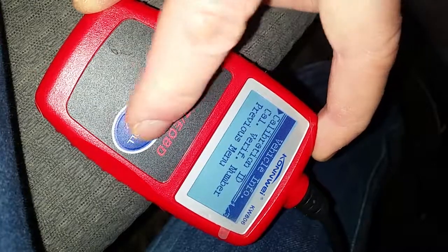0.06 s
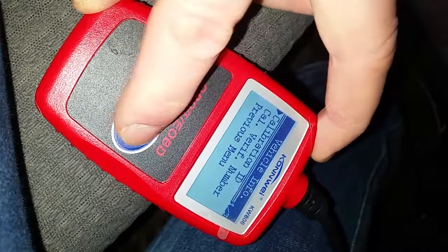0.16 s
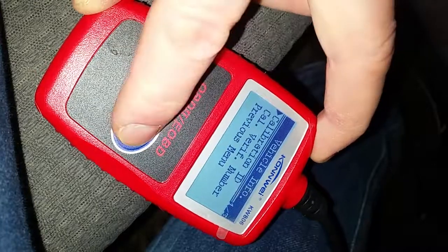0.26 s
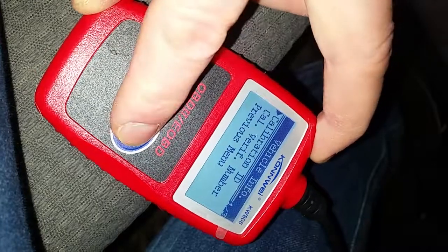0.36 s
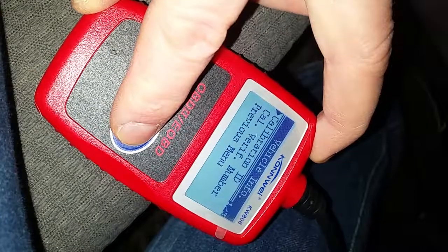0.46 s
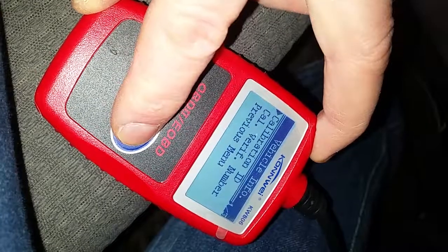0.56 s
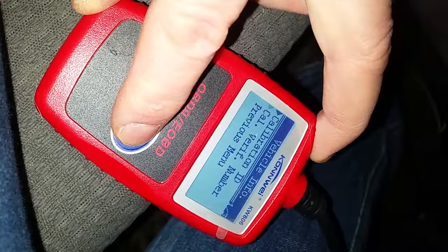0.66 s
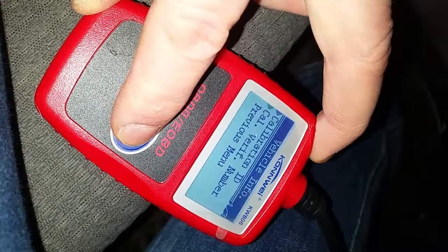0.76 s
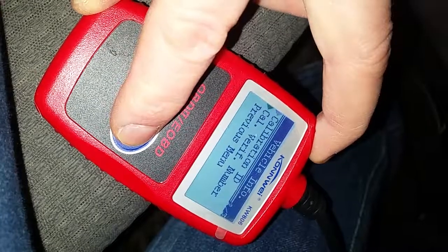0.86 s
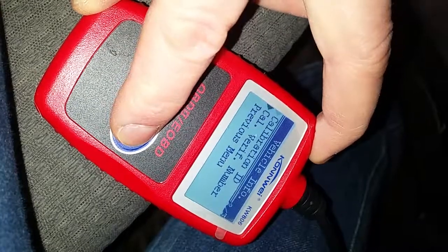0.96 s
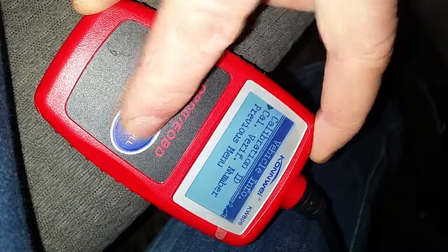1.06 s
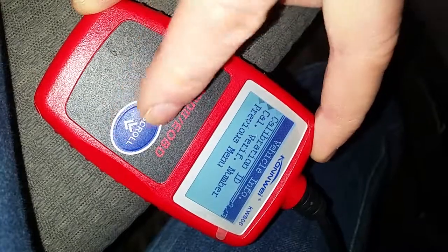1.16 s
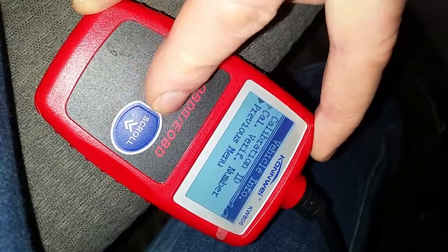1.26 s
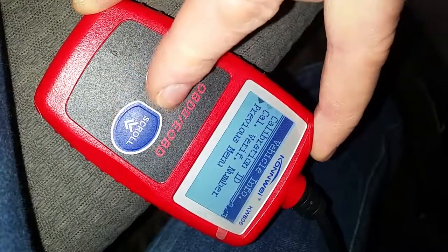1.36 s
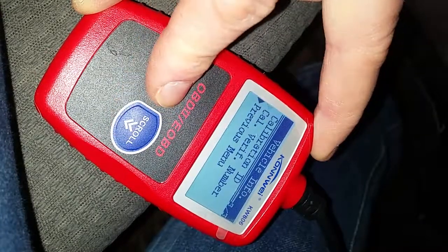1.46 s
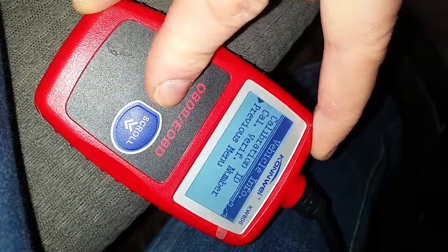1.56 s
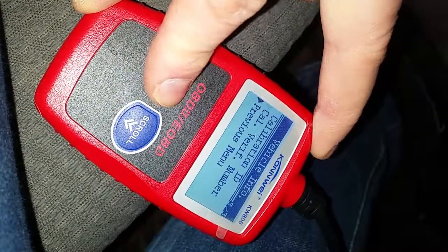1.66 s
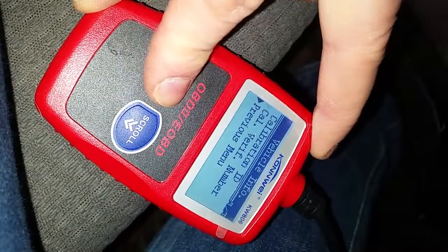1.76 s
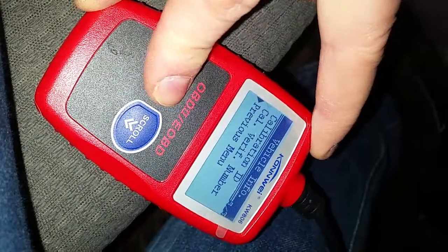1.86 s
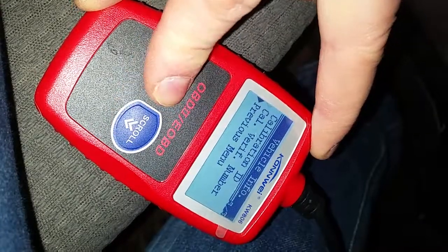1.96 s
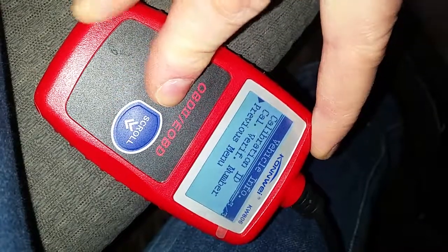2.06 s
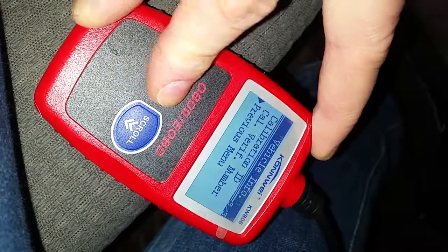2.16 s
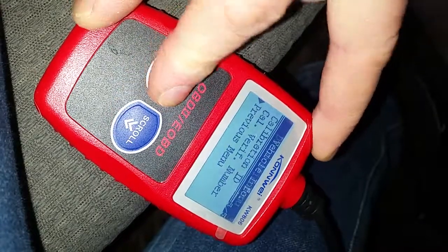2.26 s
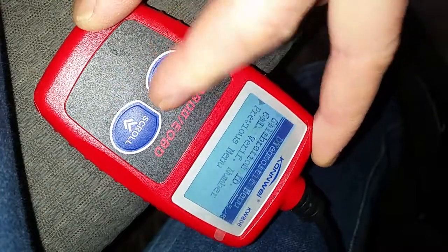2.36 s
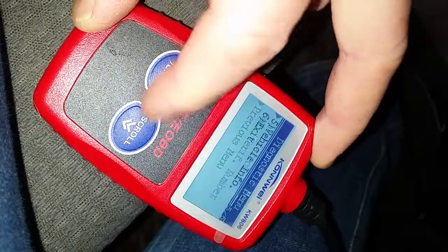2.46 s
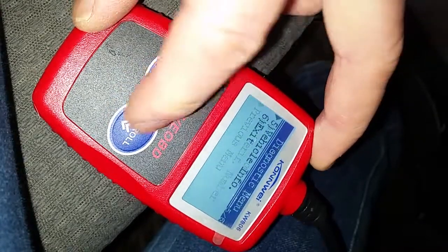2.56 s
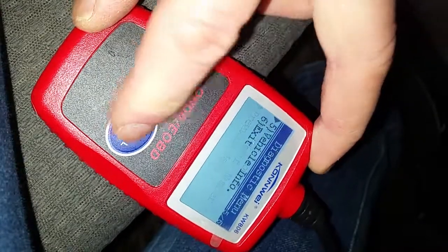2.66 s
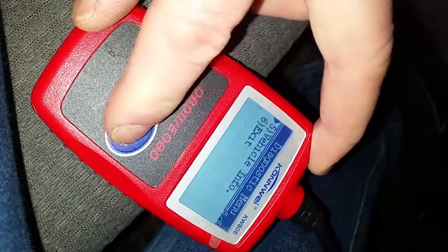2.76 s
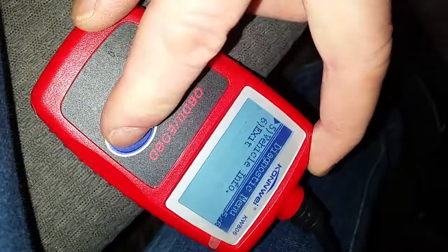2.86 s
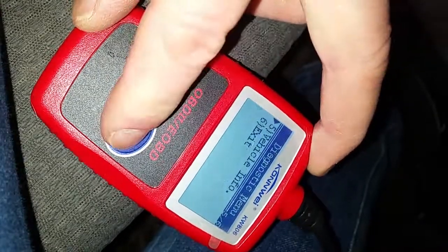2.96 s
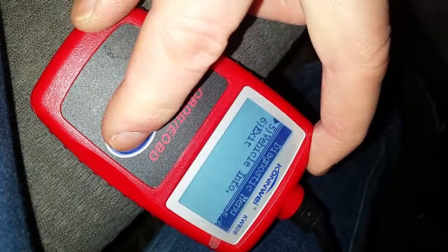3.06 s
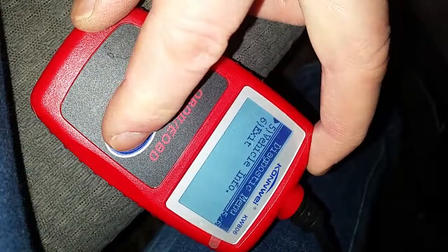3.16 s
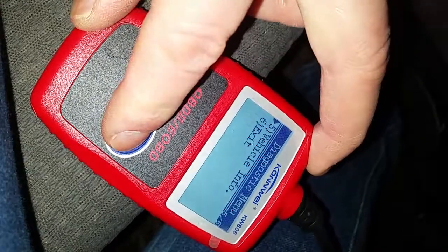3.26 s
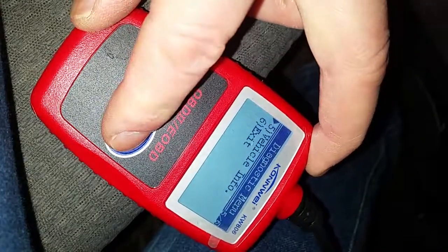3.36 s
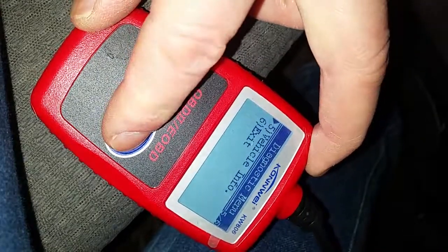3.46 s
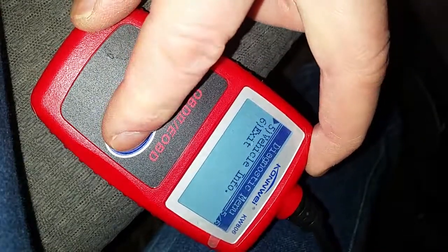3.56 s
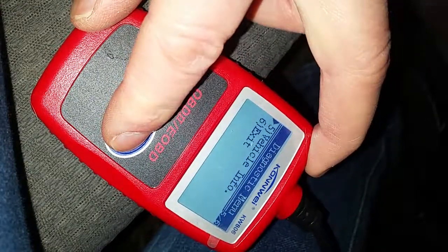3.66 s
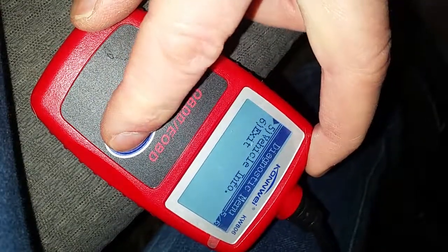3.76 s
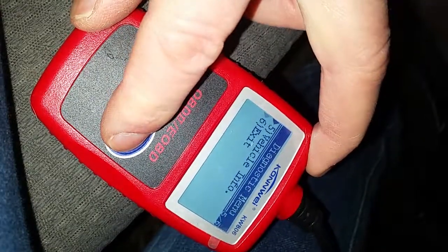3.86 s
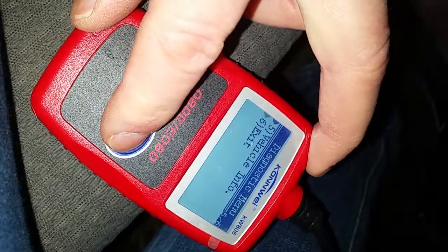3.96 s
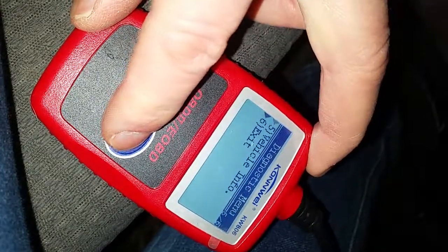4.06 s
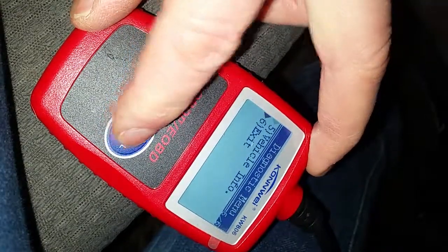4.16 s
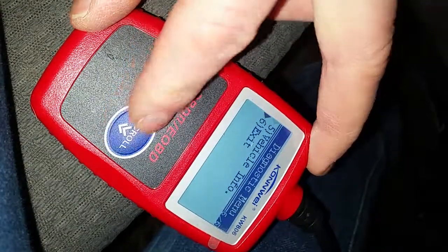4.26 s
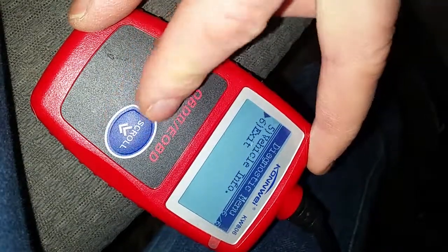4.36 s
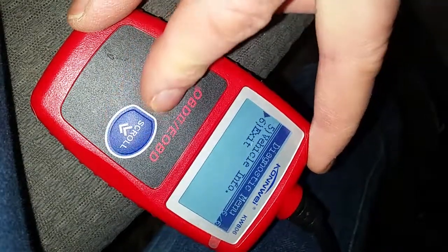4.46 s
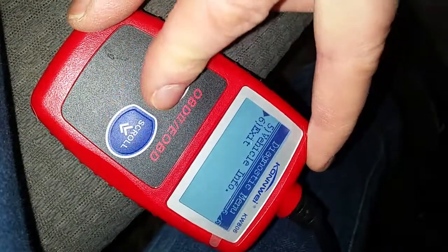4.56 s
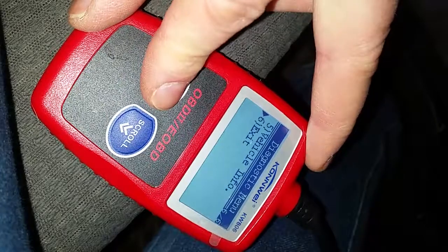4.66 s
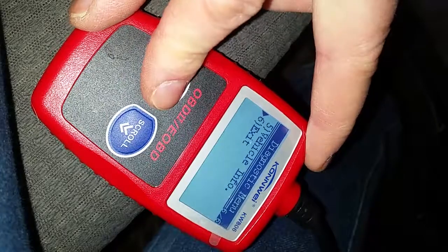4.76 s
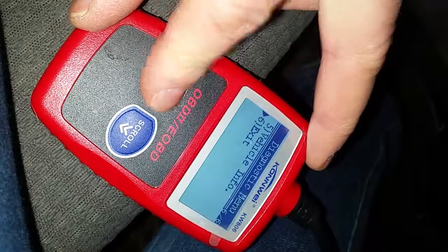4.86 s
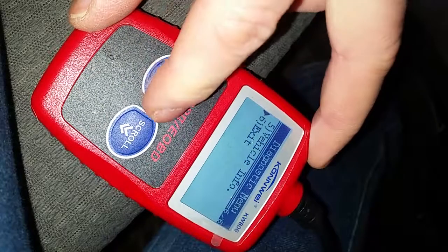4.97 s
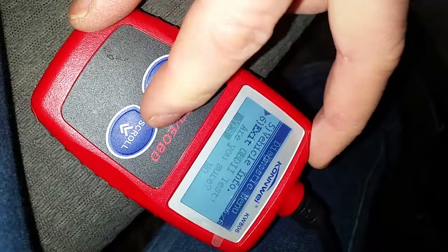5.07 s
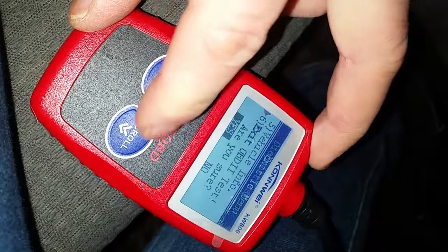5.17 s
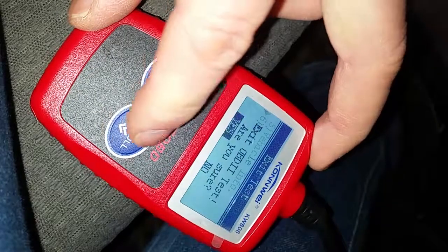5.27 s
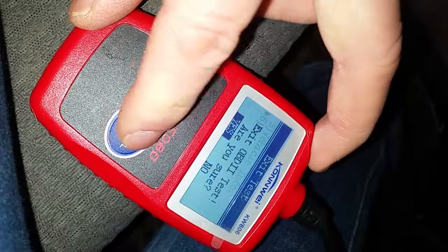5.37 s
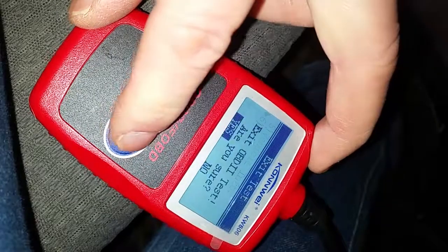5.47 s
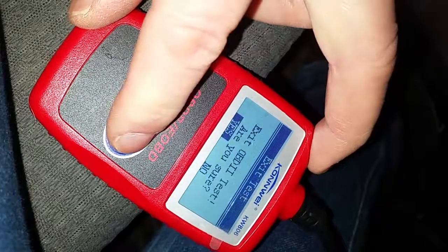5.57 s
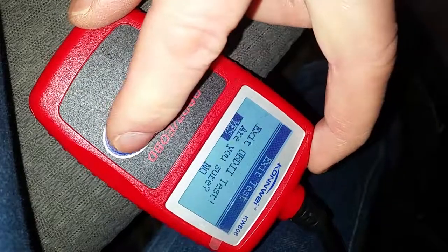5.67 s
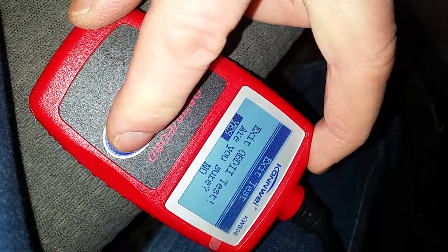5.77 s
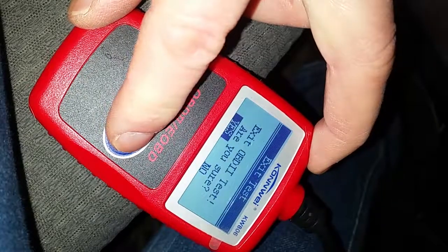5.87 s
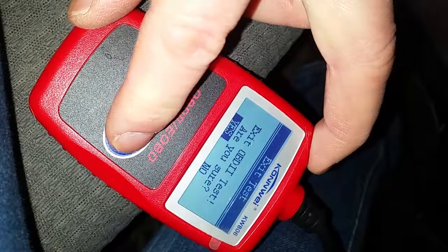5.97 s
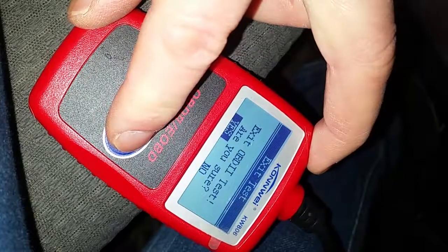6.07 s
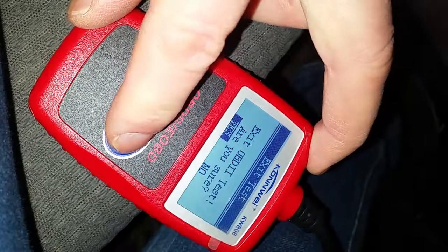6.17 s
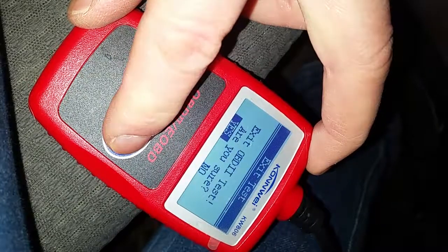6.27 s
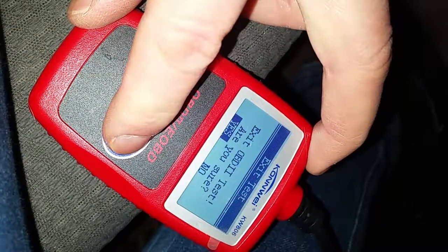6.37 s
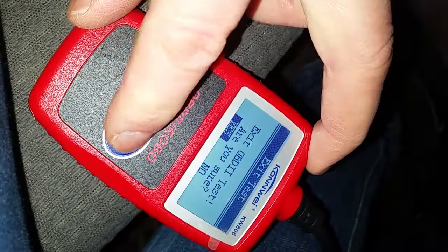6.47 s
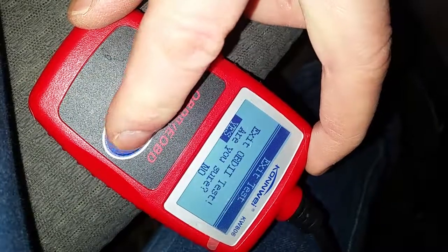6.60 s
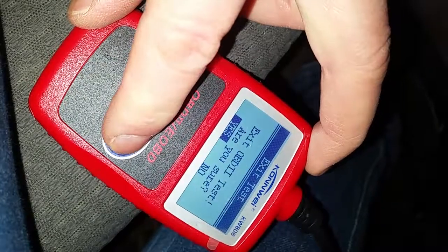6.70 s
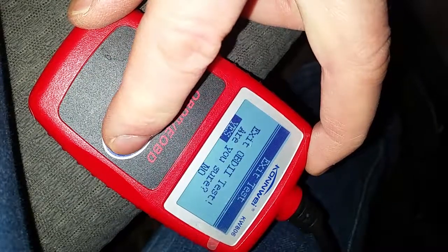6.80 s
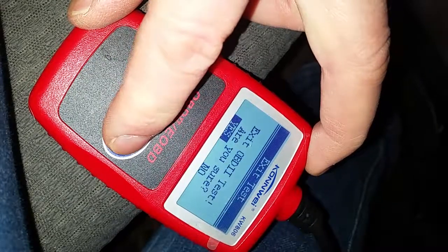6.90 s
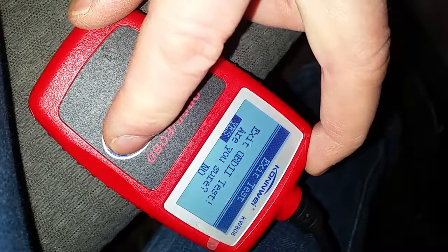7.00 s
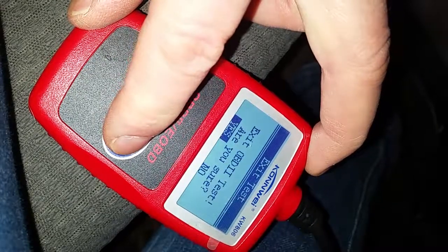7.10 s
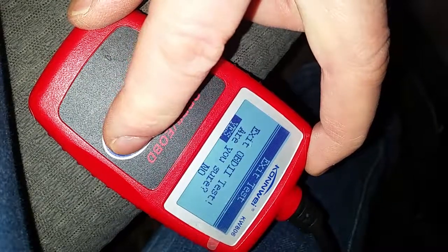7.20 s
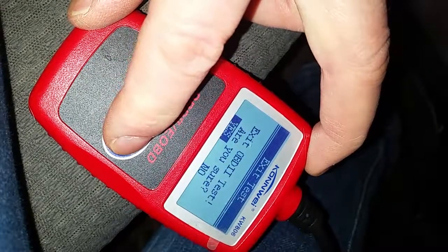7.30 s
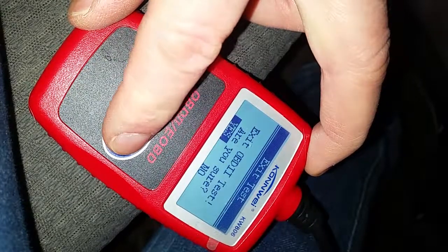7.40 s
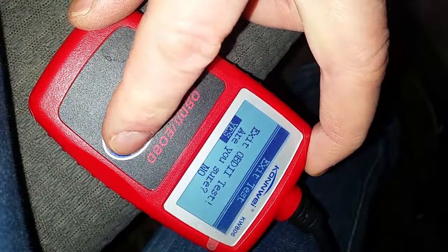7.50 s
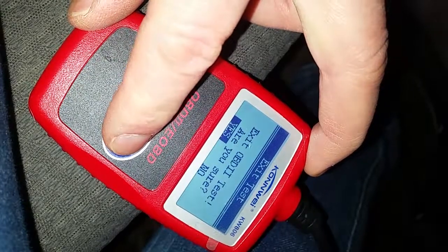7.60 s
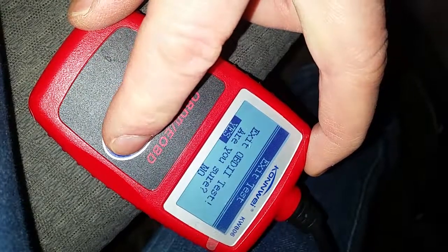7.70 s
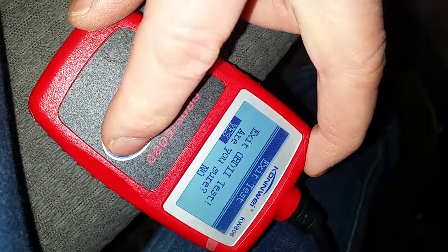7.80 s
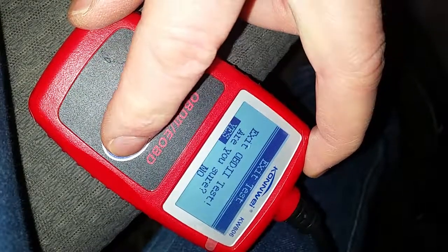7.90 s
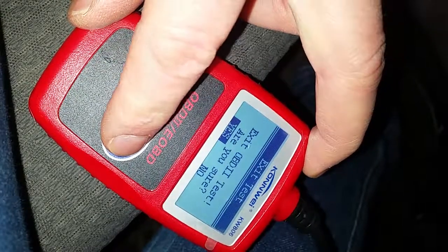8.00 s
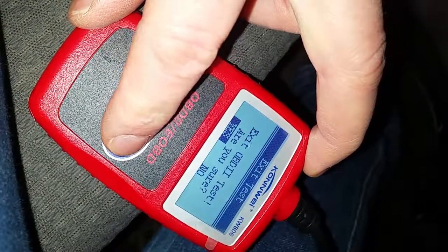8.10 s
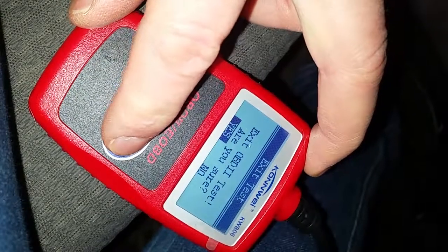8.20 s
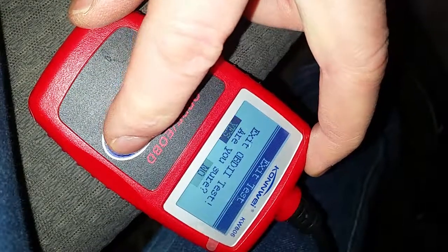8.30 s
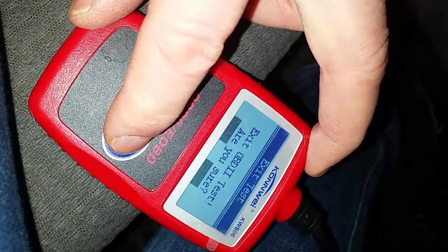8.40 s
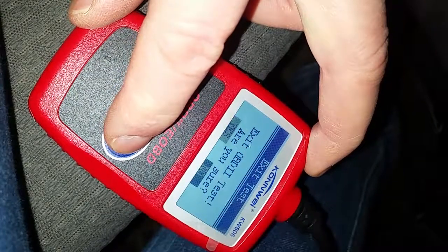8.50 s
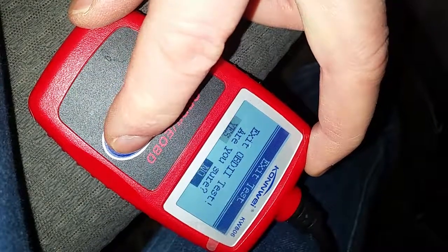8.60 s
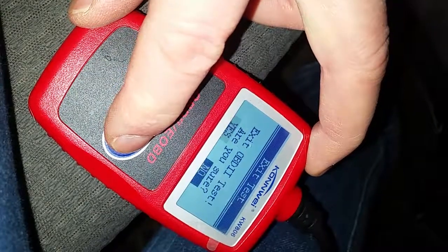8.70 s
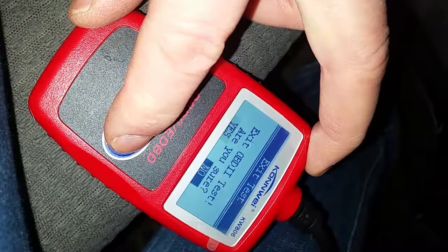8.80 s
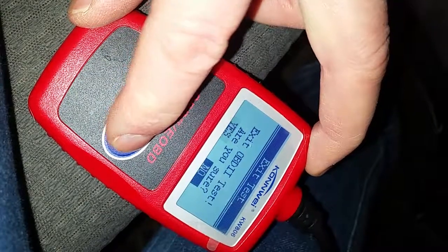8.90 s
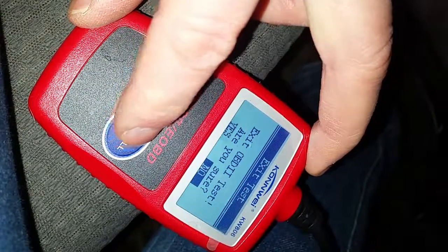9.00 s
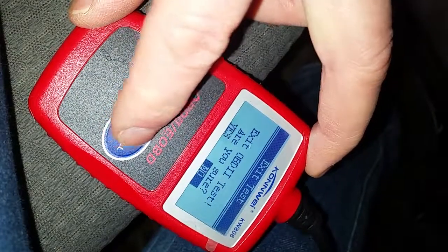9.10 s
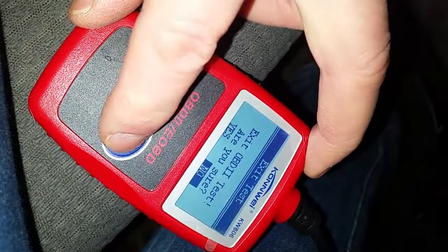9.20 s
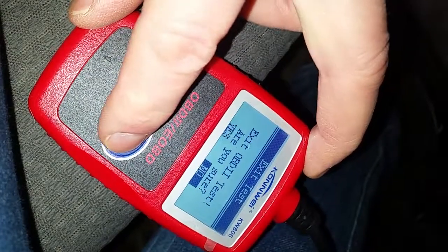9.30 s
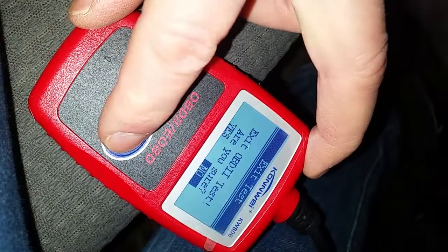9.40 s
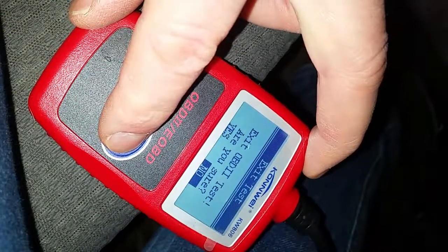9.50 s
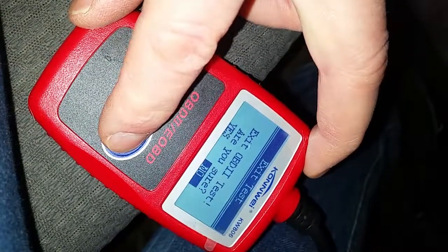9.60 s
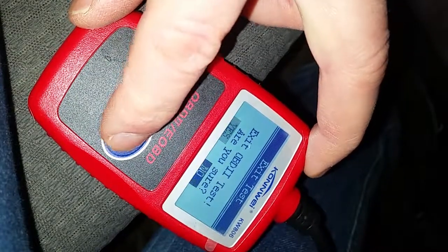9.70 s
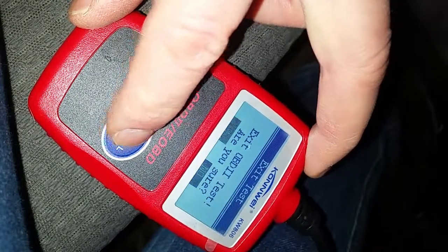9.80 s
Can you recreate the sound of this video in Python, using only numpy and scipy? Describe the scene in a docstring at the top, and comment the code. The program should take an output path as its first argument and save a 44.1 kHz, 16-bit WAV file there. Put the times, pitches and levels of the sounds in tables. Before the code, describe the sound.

Inside a quiet, padded car cabin, a thumb works stiff plastic buttons right beside the microphone. Each stroke is a bright snap with a small boxy knock, answered by a slightly harder release click. Early presses are mixed with dull touches and faint sliding skin; after five seconds only the background remains for about three seconds, then two more separate presses. Low hum, rumble and faint hiss continue throughout.

```python
"""Buttons of a small plastic handheld device, worked by a thumb close to a stereo microphone, inside a car.
Each stroke clicks twice, down and back up: filtered noise bursts tick and a bank of case modes knocks.
Between strokes, touches ring the same modes and a sliding hand makes faint swells of rough noise.
The padded cabin adds a short echo and a bright hush trails each click.
Behind lie a low hum of wavering tones over rumble, and a thin steady hiss of shaped noise."""
import sys
import numpy as np
from scipy import signal
from scipy.fft import rfft, irfft
from scipy.io import wavfile
from scipy.ndimage import uniform_filter1d

SR = 44100
rng = np.random.default_rng(int(sys.argv[2]) if len(sys.argv) > 2 else 0)


def output_pcm(signal):
    """Save a mono or channel-first signal as 16-bit PCM at the path in sys.argv[1].

    Samples are clipped to [-1, 1] before scaling.
    """
    pcm = np.clip(np.atleast_2d(signal).T, -1, 1) * 32767
    wavfile.write(sys.argv[1], SR, np.round(pcm).astype(np.int16))


N = 434385  # length of the scene [samples]

# Button strokes, levels relative: (down time [s], back up time [s], knock level [dB],
# upper case mode level [dB], upward tick level [dB], upward tick tilt [dB per octave])
BUTTON_STROKES = [(.403, 0.6539, -4, 1.5, -1, -4), (0.949, 1.1153, -5.5, 4.5, 2.5, -2),
                  (1.8682, 2.142, -7.5, 7.5, 1, -2.5), (3.6545, 3.8817, -2, -0.5, -1, -2),
                  (4.761, 4.9454, -5.5, 7, 4.5, -1), (7.9904, 8.2435, -4, -0.5, 2.5, 0),
                  (9.4876, 9.681, -1.5, -1.5, 2, -1)]
# Tick colour as the dome gives way: (frequency [Hz], left level [dB], right level [dB])
PRESS_TICK_COLOUR = [(1800, -32, -44), (2520, -41, -19), (3480, -14, -13), (5000, -4.5, -18),
                     (6070, -24, -16), (6220, -4, -11), (7000, -23, -18.5), (8570, -10.5, -9.5),
                     (10000, -33, -8), (11650, -3, -2.5), (13200, -27, -8), (13900, -14, 3.5),
                     (15300, 1, 2), (16500, -20, 19)]
# Tick colour as the dome springs back: (frequency [Hz], left level [dB], right level [dB])
RELEASE_TICK_COLOUR = [(1850, -20, -33), (2710, -45, -13.5), (3330, -10.5, -18.5), (4400, -13, -11.5),
                       (5160, -4.5, -14), (5470, -27.5, -15), (6200, -7.5, -23), (6920, -26, -22),
                       (10850, -38, -25.5), (12700, -21, -11.5), (13400, -28, -17), (15700, -21, -13),
                       (16500, -23, -14)]
# Modes of the hand-held case, relative:
# (frequency [Hz], decay by 60 dB [s], left level [dB], right level [dB])
CASE_MODES = [(117, 0.12, -48, -46), (213, 0.029, -24.5, -23), (353.5, 0.02, -28, -29.5),
              (428, 0.023, -29, -27.5), (573, 0.022, -33, -32), (827, 0.021, -27.5, -28),
              (915, 0.018, -44, -24), (1037, 0.016, -25.5, -37.5), (1333, 0.037, -38, -50.5),
              (1465, 0.021, -28, -34.5), (1710, 0.025, -30.5, -42), (2020, 0.036, -66, -41)]
# Thumb and fingers touching the case, levels relative:
# (time [s], knock level [dB], contact time [s], lowest case mode level [dB], tick level [dB])
CASE_TOUCHES = [(.325, -21, 0.00095, 6, -34), (1.641, -12, 0.0014, 5, -22), (1.656, -2, 0.0068, 0, -45),
                (1.669, -14, 0.00193, 0.5, -37), (1.686, -9.5, 0.0029, 5, -39),
                (2.444, -32, 0.00055, 5, -29), (3.361, -25.5, 0.0012, 3, -44),
                (4.924, -20, 0.0014, -2, -19), (9.337, -20.5, 0.00095, 6.5, -36),
                (9.369, -37, 0.00076, 0, -24), (9.407, -6.5, 0.0021, -20, -46)]
# The hand sliding over the case:
# (centre time [s], half length to 1/e [s], dull rub level [dB], fine skin hiss level [dB])
HAND_SLIDES = [(0.058, 0.34, -72.5, -80), (1.2, 0.08, -67, -71), (1.303, 0.17, -63, -79),
               (1.672, 0.049, -61.5, -68), (2.417, 0.25, -69, -71.5), (4.38, 0.11, -61, -73),
               (4.511, 0.042, -63, -81.5), (4.68, 0.14, -68.5, -70.5), (4.975, .05, -61, -72),
               (5.077, 0.25, -70.5, -73.5)]
# Relative colour of the dull rub: (frequency [Hz], level [dB])
RUB_COLOUR = [(250, -10), (480, 6), (630, 2), (800, 3.5), (960, -3), (1150, -18), (1550, -16.5),
              (1850, -11), (2300, -32.5), (5000, -25), (9000, -59.5)]
# Relative colour of the fine skin hiss: (frequency [Hz], level [dB])
SKIN_COLOUR = [(900, -5.5), (1350, 10), (1900, 3), (2300, -5.5), (3000, -0.5), (6500, -16.5), (9500, -9),
               (12500, -1.5), (16000, -5.5)]
# Relative colour of the hush behind each click: (frequency [Hz], level [dB])
HUSH_COLOUR = [(300, -9), (900, 0), (1500, 6.5), (2500, -6), (6000, -9.5), (9500, -16), (12000, -3.5),
               (14500, 1), (16000, 4)]
# Steady tones of the hum, before they throb: (frequency [Hz], level [dB rms])
HUM_TONES = [(97, -62), (212.3, -53.5), (388, -77.5), (425, -77.5), (582, -93), (646, -82), (775, -81.5)]
# Low cabin rumble, the part alike left and right: (frequency [Hz], density [dB per Hz])
CABIN_RUMBLE = [(10, -102), (30, -93), (38, -74), (49, -71.5), (70, -73), (110, -70), (150, -77.5),
                (220, -79), (300, -85.5), (450, -95), (700, -102), (1000, -110), (1500, -118), (3000, -135),
                (6000, -160)]
# Thin steady hiss: (frequency [Hz], left density [dB per Hz], right density [dB per Hz])
THIN_HISS = [(1500, -117, -117), (2420, -119, -120), (2895, -114, -108), (3160, -113, -107),
             (3685, -107, -92), (4185, -109, -95.5), (4704, -114, -104), (5710, -127, -134),
             (6470, -133, -134), (9900, -133, -132.5), (12100, -124, -121), (13560, -121, -116),
             (14140, -112.5, -103), (15300, -113, -104.5)]

# The dome gives way at the same force each time, so its downward tick is nearly alike.
PRESS_TICK_DB, PRESS_TILT_DB = -2.3, -0.5  # level [dB] before the stiffness lift, tilt [dB per octave]
# A stiffer contact, which drives the upper case modes, also lifts the downward tick.
TICK_PER_UPPER = 0.18  # [dB per dB]
# Springing back, the button knocks harder and drives the upper modes more.
RELEASE_KNOCK_DB, RELEASE_UPPER_DB = 4, 3.5  # [dB]
PRESS_RING_DB = -11  # the dome's ring under its first crack, going down [dB]
TOP_HZ = 15900  # upper edge of the recorder's band [Hz]


def strokes():
    """Split each stroke into a click down and a click up, as rows for clicks()."""
    presses, releases = [], []
    for down_s, up_s, knock_db, upper_db, tick_db, tilt_db in BUTTON_STROKES:
        press_tick_db = PRESS_TICK_DB + TICK_PER_UPPER * upper_db
        presses.append((down_s, knock_db, upper_db, press_tick_db, PRESS_TILT_DB))
        release_knock_db = knock_db + RELEASE_KNOCK_DB
        releases.append((up_s, release_knock_db, upper_db + RELEASE_UPPER_DB, tick_db, tilt_db))
    return presses, releases


def clicks(rows, direction, spectrum, crack_t60, ring_t60, ring_db, knock_db, recoil_db):
    """The dome flips with a tick and a small recoil; a moment later the button hits its stop."""
    travel_s = 0.001098
    out = np.zeros((2, N))
    for s, level_db, upper_db, tick_db, tilt_db in rows:
        snap = tick(spectrum, crack_t60, ring_t60, ring_db, tilt_db)
        recoil = knock(0.00065, upper_db)
        stop = knock(0.00067, upper_db)
        add(out, s, undb(tick_db) * snap)
        add(out, s, -direction * undb(level_db + recoil_db) * recoil)
        add(out, s + travel_s, direction * undb(level_db + knock_db) * stop)
    return out


def tick(spectrum, crack_t60, ring_t60, ring_db, tilt_db=0.0):
    """A sharp crack, then the dense high modes of dome and shell, as decaying noise."""
    t = np.arange(SR // 10) / SR
    shape = fade(t, crack_t60) + undb(ring_db) * fade(t, ring_t60)
    burst = rfft(noise_pair(len(t), 0) * shape, 2 * len(t))
    # the snap feeds all bands evenly; only the fine mode pattern is chance
    band_power = uniform_filter1d(np.abs(burst) ** 2, 300)
    burst = burst / np.sqrt(band_power)
    # the tilt turns about 8 kHz and levels off below 2 kHz
    octaves = np.log2(np.linspace(1, SR / 2, burst.shape[1]) / 8000)
    tilted = irfft(burst * undb(tilt_db * np.maximum(octaves, -2)))
    snap = colour(tilted, spectrum)
    # a quarter millisecond later, so that the onset before time zero is kept
    return np.roll(snap, SR // 4000, axis=1)[:, :len(t)]


def knock(contact_s, upper_db=0.0, low_db=0.0):
    """The case rings after a smooth push; grip and point of contact change its modes a little each time."""
    scatter, scatter_db = 0.013, 0.96  # spread of mode frequency [ratio] and level [dB]
    left_lag_s = 0.00015
    t = np.arange(SR // 10) / SR
    hz, t60, *ears_db = np.transpose(CASE_MODES)
    detune, vary = rng.standard_normal((2, len(hz)))
    mode_hz = hz * (1 + scatter * detune)
    modes = np.sin(2 * np.pi * mode_hz[:, None] * t) * fade(t, t60[:, None])
    # the point of contact decides how strongly the lowest and the upper modes are driven
    drive_db = low_db * (hz < 280) + upper_db * np.interp(hz, [500, 1500], [0, 1])
    ring = undb(np.array(ears_db) + drive_db + scatter_db * vary) @ modes
    # the knock reaches the right microphone first
    arrival = t - np.array([[left_lag_s], [0]])
    push = np.sin(np.pi * np.clip(arrival / contact_s, 0, 1)) ** 2
    return signal.fftconvolve(ring, push / push[1].sum(), axes=1)[:, :len(t)]


def touches():
    """Soft skin pushes slowly, so mainly the low modes answer; the nail adds a tiny tick."""
    out = np.zeros((2, N))
    for s, knock_db, contact_s, low_db, tick_db in CASE_TOUCHES:
        skin_knock = knock(contact_s, upper_db=-0.5, low_db=low_db)
        nail = tick(RELEASE_TICK_COLOUR, crack_t60=0.0037, ring_t60=0.025, ring_db=-16, tilt_db=4.0)
        add(out, s, -undb(knock_db) * skin_knock)
        add(out, s, undb(tick_db) * nail)
    return out


def slides(grain_db=1.0, skin_grain_db=2.5):
    """Faint uneven friction that swells and fades with each move of the hand."""
    t = np.arange(N) / SR
    catch = walk(90)  # the same unevenness roughens rub and skin
    rub_grain = undb(grain_db * catch + 2 * walk(900))
    rub = colour(noise_pair(N, 0.56) * rub_grain, RUB_COLOUR)
    skin = colour(noise_pair(N, 0) * undb(skin_grain_db * catch), SKIN_COLOUR)
    rub, skin = rub / rub.std(), skin / skin.std()
    out = np.zeros((2, N))
    for s, half_s, rub_db, skin_db in HAND_SLIDES:
        swell = np.exp(-((t - s) / half_s) ** 2)
        out += swell * (undb(rub_db) * rub + undb(skin_db) * skin)
    return out


def hush(rows, db=-68.0, t60=1.7):
    """A faint bright noise starts at each click and dies away; overlapping tails add in power."""
    t = np.arange(N) / SR
    power = sum((t > s) * fade(np.abs(t - s), t60) ** 2 for s, *_ in rows)
    air = colour(noise_pair(N, 0), HUSH_COLOUR)
    return undb(db) * np.sqrt(power) * air / air.std()


def cabin(x, wall_db=-20.0, wall_t60=0.17):
    """Short diffuse reflections from the padded cabin, as decaying noise that builds up first."""
    t = np.arange(SR // 3) / SR
    walls = noise_pair(len(t), 0.2) * fade(t, wall_t60) * (1 - fade(t, 0.02))
    walls = undb(wall_db) * walls / np.linalg.norm(walls[0])
    echo = signal.fftconvolve(x, walls, axes=1)[:, :N]
    return colour(echo, [(300, 2.5), (1500, -6.5), (7000, 3), (15000, 0.0)])


def hum(waver_hz=1.304, throb_db=1.05):
    """Steady tones that waver slightly, over a rumble that is alike left and right in the bass."""
    tones = 0
    for hz, db in HUM_TONES:
        phase = 2 * np.pi * np.cumsum(hz + waver_hz * walk(7)) / SR
        level = np.sqrt(2) * undb(db + throb_db * walk(9))
        tones = tones + level * np.sin(phase)
    mid, side = rng.standard_normal((2, N)) * np.sqrt(SR / 2)  # unit power per Hz
    side = colour(side, [(50, -20.5), (110, -16.5), (200, -13.5), (400, -3.5), (1000, 1.5)])
    return tones + colour(mid + side * np.array([[1], [-1]]), CABIN_RUMBLE)


def hiss():
    """Smooth noise with one hump in the presence range and one at the very top."""
    return colour(noise_pair(N, 0.06) * np.sqrt(SR / 2), THIN_HISS)


def undb(db):
    """Turn decibels into an amplitude ratio."""
    return 10 ** (np.asarray(db) / 20)


def fade(t, t60):
    """Exponential decay, 60 dB down after t60 seconds."""
    return np.exp(-np.log(1000) * t / t60)


def colour(x, points):
    """Filter by (Hz, dB) or (Hz, left dB, right dB) points joined on a log-frequency axis."""
    hz, *columns = np.transpose(points)
    size = x.shape[-1]
    log_f = np.log(np.arange(size // 2 + 1) * SR / size + 1)
    gains_db = [np.interp(log_f, np.log(hz), column) for column in columns]
    return irfft(rfft(x) * undb(gains_db), size)


def noise_pair(size, likeness):
    """Left and right white noise with the given correlation."""
    mid, side = rng.standard_normal((2, size))
    c = np.clip(likeness, -1, 1)
    return np.sqrt((1 + c) / 2) * mid + np.sqrt((1 - c) / 2) * side * np.array([[1], [-1]])


def walk(rate):
    """Random levels, held 1 / rate seconds and smoothed twice over that time; spread 1."""
    k = int(SR / rate)
    held = np.repeat(rng.standard_normal(N // k + 1), k)
    w = uniform_filter1d(uniform_filter1d(held, k), k)[:N]
    return w / w.std()


def add(out, s, sound):
    """Mix a sound in at time s in seconds."""
    i = int(s * SR)
    out[:, i:i + sound.shape[-1]] += sound[:, :N - i]


def scene(low_cut_hz=55):
    """The device close by in the cabin, with the moving hand and the steady background."""
    presses, releases = strokes()
    # the sign of direction sets which way the case is pushed, its size scales the knocks
    down = clicks(presses, -1.084, PRESS_TICK_COLOUR, crack_t60=0.005, ring_t60=0.045,
                  ring_db=PRESS_RING_DB, knock_db=-2.0, recoil_db=-15)
    up = clicks(releases, 0.94, RELEASE_TICK_COLOUR, crack_t60=0.0025, ring_t60=0.024,
                ring_db=3.0, knock_db=-1.0, recoil_db=-20)
    # so small a case radiates no deep bass
    low_cut = signal.butter(2, low_cut_hz, "highpass", fs=SR, output="sos")
    device = signal.sosfilt(low_cut, down + up + touches())
    return device + cabin(device) + hush(presses + releases) + slides() + hum() + hiss()


def record(dry):
    """The recorder cuts the very top with a steep low-pass."""
    return signal.sosfilt(signal.ellip(10, 0.2, 70, TOP_HZ, fs=SR, output="sos"), dry)


dry = scene()
out = record(dry)
output_pcm(out)
```